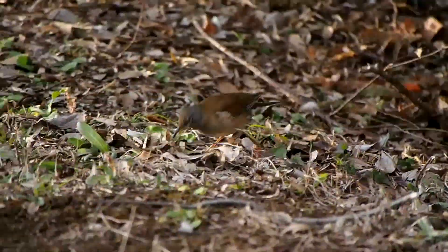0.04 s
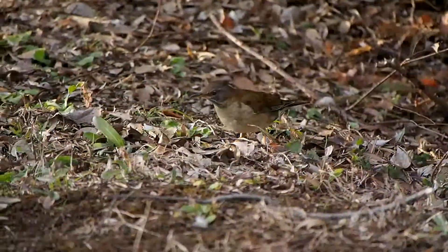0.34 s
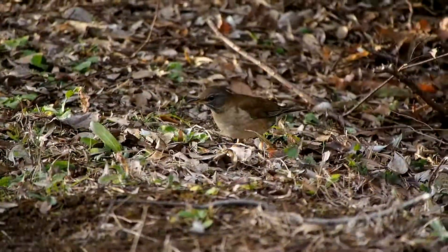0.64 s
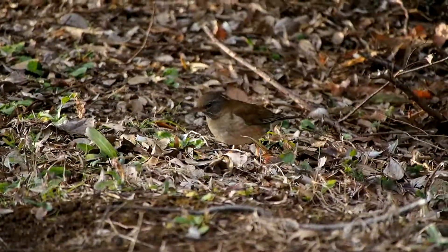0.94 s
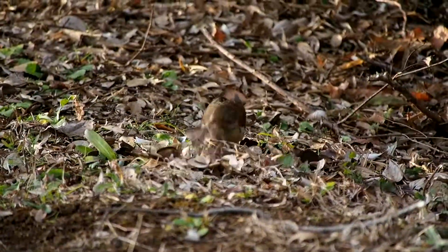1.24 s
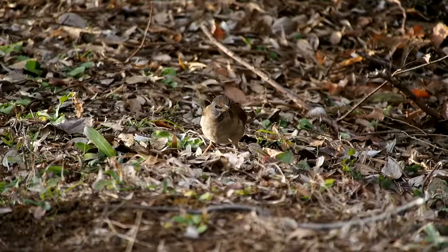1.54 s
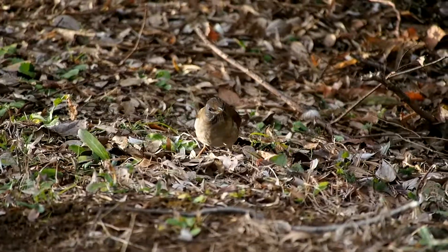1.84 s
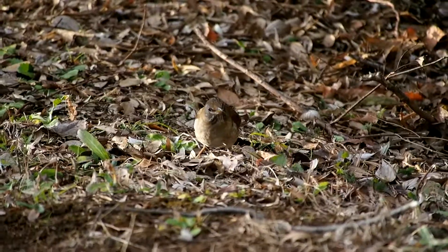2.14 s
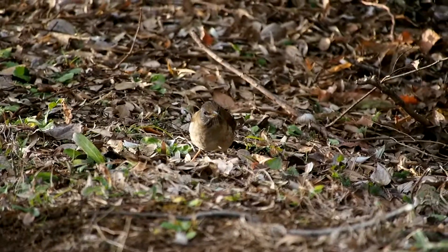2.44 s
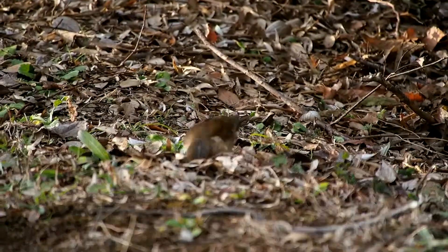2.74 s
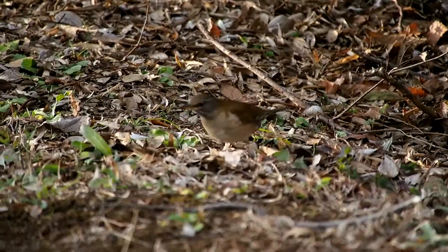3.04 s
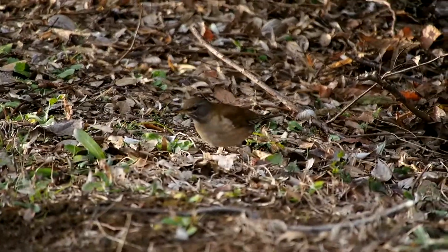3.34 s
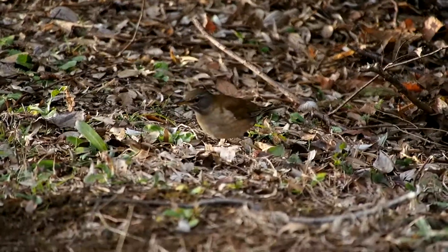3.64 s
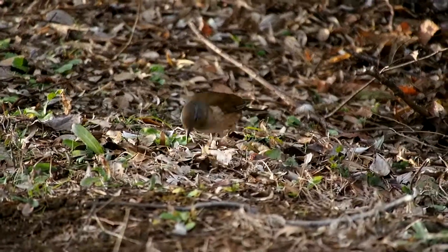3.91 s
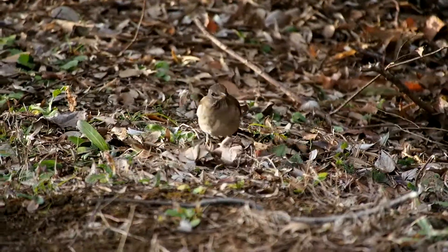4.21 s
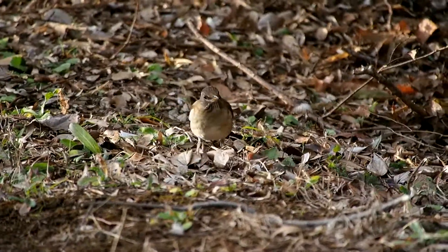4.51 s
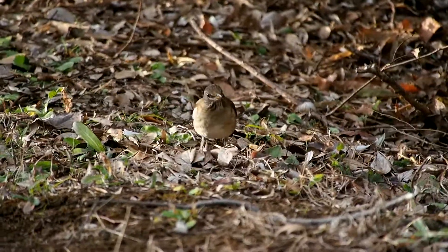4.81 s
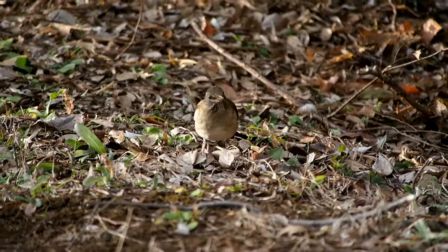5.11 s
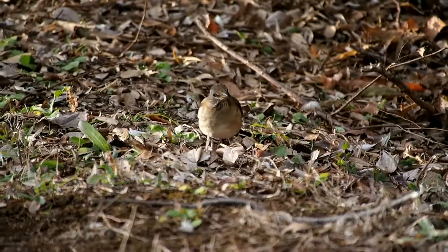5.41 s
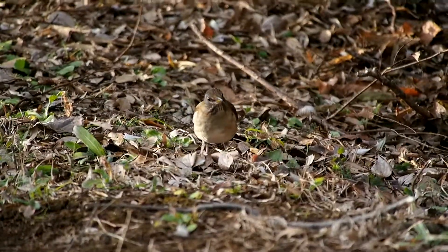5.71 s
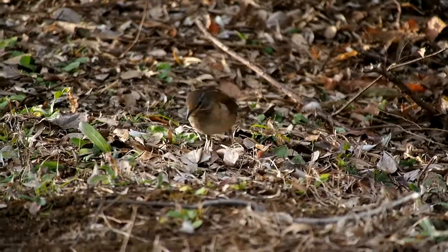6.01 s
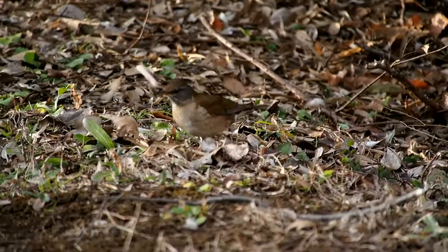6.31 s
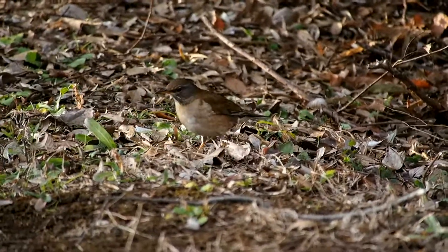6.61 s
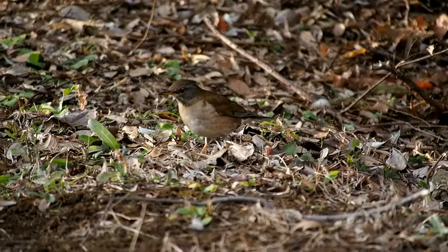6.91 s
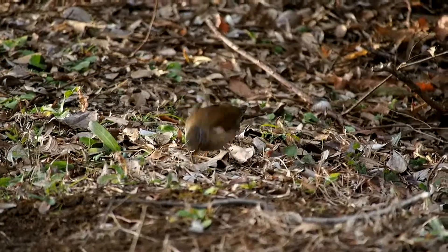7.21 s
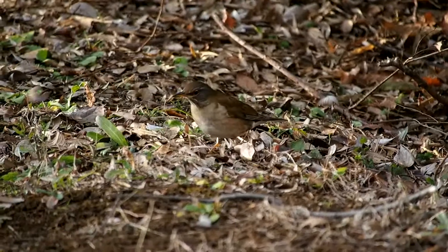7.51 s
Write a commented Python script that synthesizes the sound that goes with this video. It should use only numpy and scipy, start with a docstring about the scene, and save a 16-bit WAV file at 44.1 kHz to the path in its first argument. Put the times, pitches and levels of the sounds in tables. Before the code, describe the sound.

Crisp clicks from a plastic camera dial right by the microphone stand out against quiet woods, with far traffic and a faint hiss behind. Dry leaves crackle softly now and then as a thrush forages, and very short, high chirps come from the right, some in pairs. A distant car passes, the dial clicks one last time, and after a small knock a truck's tyres rise gently in pitch.

```python
"""Woodland floor, with a distant road throughout: tyre roar, rumble, one slowly sagging engine, faint hiss.
From the start a thrush tosses dry leaves in short bursts. At 0.14 s a plastic camera dial starts
clicking close by, among softer ticks and knocks. From 1.35 s a small bird on the right gives thin,
rising 'tsik' calls. A car swells the roar at 2 s, the dial clicks a last time at 4.1 s,
and near 6 s a truck draws close, its tyres singing upward."""
import sys
import numpy as np
from scipy import signal
from scipy.fft import rfft, irfft
from scipy.io import wavfile
from scipy.ndimage import uniform_filter1d

SR = 44100
rng = np.random.default_rng(int(sys.argv[2]) if len(sys.argv) > 2 else 0)


def wrap_up_sound(samples):
    """Save the sound to the file named by the first command line argument, as 16-bit audio."""
    columns = np.atleast_2d(samples).T
    # keep every value between -1 and 1, then stretch to whole-number steps
    tamed = np.clip(columns, -1, 1)
    steps = np.round(tamed * 32767).astype(np.int16)
    wavfile.write(sys.argv[1], SR, steps)


N = 332955
TIME_S = np.arange(N) / SR
FRAME_S = np.arange(N // 256 + 5)[:, None] * 256 / SR
BIN_HZ = np.fft.rfftfreq(1024, 1 / SR)
CAR_NEAREST_S, BAND_EDGE_HZ = 2.065, 16400

# left-right likeness of diffuse sound: freq_hz, coherence
COHERENCE = [(60, 0.76), (130, 1), (290, 0.89), (640, 0.93), (1410, 0.3), (3100, 0.022), (6820, 0.046),
             (15000, 0.05)]
# tyre roar spectra: freq_hz, density_db
FAR_ROAR = [(220, -31), (380, -22), (514, -8), (577, -8.5), (627, -9), (711, -7), (765, -2), (922, -2),
            (1060, 1), (1650, -3.5), (2170, -10.5), (2850, -13), (3160, -11.3), (3560, -19), (3760, -17),
            (4140, -22), (4600, -28.5), (5980, -28), (10100, -120)]
CAR_ROAR = [(220, -37.5), (380, -18), (520, -8), (640, -8.5), (781, 0.5), (876, -2.5), (1080, -0.5),
            (1320, -2.5), (1550, -4), (1780, -12), (3160, -18.5), (4600, -31), (5980, -29.5), (10100, -120)]
TRUCK_ROAR = [(220, -57), (380, -23), (553, -16.5), (634, 1), (689, -8), (757, -2.5), (932, 1),
              (1390, -6.5), (1640, -3), (1840, -8.5), (2190, -14.5), (2510, -19), (2850, -18.5),
              (3160, -15.5), (3560, -24.5), (3760, -24), (4230, -30.5), (4600, -38), (5980, -38),
              (10100, -120)]
# rising tyre resonance: time_s, pitch_hz, lift_db
TYRE_PEAK = [(5.5, 655, 7.5), (6.1, 715, 11), (6.4, 730, 5), (6.7, 880, 3.5), (7.55, 915, -8)]
# rumble spectra before and after the car: freq_hz, density_db
EARLY_RUMBLE = [(20, -39), (35, -34), (52, -16), (75, 6), (110, -10.5), (170, 2), (225, 4), (290, 1.5),
                (370, -6.5), (500, -27)]
LATE_RUMBLE = [(20, -42), (35, -46), (52, -20), (75, 1.5), (110, -16.5), (170, 4), (220, -1.5), (290, -4.5),
               (370, -11.5), (500, -37)]
# exhaust tones: firing_multiple, gain_db
EXHAUST_ORDERS = [(1, -9), (1.51, -12.5), (2.001, -3.5)]
# hiss spectrum: freq_hz, density_db
HISS_SPECTRUM = [(2500, -4.5), (4000, 1.5), (4800, 3), (5500, 0), (6250, 5.5), (7500, 1.5), (9000, 0.5),
                 (12000, -2), (14500, -3.5), (15600, -7), (16100, -40)]
# leaf stirs by bill and feet: middle_s, level_db, half_length_s, crunch_db
LEAF_STIRS = [(0.056, -54.5, 0.089, -12), (1.157, -57.5, 0.018, -12), (1.306, -50.5, 0.045, -10),
              (2.02, -56, 0.079, -7), (2.837, -54.5, 0.072, -12), (4.089, -54.5, 0.057, -12),
              (6.188, -55, 0.02, -8), (6.246, -48, 0.003, -16), (6.262, -45, 0.012, -20),
              (6.284, -51, 0.003, -17), (6.31, -52, .008, -9), (6.53, -55, 0.012, -6),
              (7.367, -47, 0.021, -16), (7.421, -45, 0.008, -10)]
# leaf snap spectrum: freq_hz, density_db
LEAF_SPECTRUM = [(2000, -15), (5000, -1), (6500, -1), (9000, 3.5), (12500, 3.5), (14800, 1.5), (15800, -11),
                 (16200, -22)]
# dial detents: start_s, level_db, snap_db, thud_db
DIAL_DETENTS = [(0.1441, 1.2, -3, -2), (0.3768, -18.8, -12.5, 8), (0.9444, 0, -3, -0.5),
                (1.1021, -2, -5.6, 2), (1.2124, -3, -4, 1.2), (4.1313, 1, -1, 0)]
# spring and camera body modes: freq_hz, left_db, right_db, t60_s
DIAL_MODES = [(1610, -29, -25.5, 0.0086), (2100, -25, -27.5, 0.0069), (2680, -27, -24.5, 0.0041),
              (3100, -26, -27, 0.013), (4060, -43, -20.5, 0.0029), (4750, -22, -51, 0.0054),
              (6430, -17.2, -32.5, 0.012), (6900, -17.5, -8.5, 0.0027), (8100, -4, -8, 0.0034),
              (9000, -21, -55, 0.014), (9754, 2.5, -16, 0.0011), (12160, -9.8, -6, 0.0027),
              (13630, -35, -3, 0.00045), (15410, -18, -39, 0.0051)]
# ticks and knocks, one ring a row: start_s, level_db, pitch_hz, t60_s, crack_db, left_over_right_db
TICK_RINGS = [(.1662, -37.5, 12500, .004, -12, 3), (.2100, -40, 12700, .004, -9, 8),
              (0.8078, -33.5, 12900, 0.0045, -10, 12), (0.8078, -38, 7500, 0.004, -12, 10),
              (1.0068, -20.5, 740, 0.014, -25, 2), (1.007, -23, 1400, .006, -22, 0),
              (1.0063, -27, 3170, 0.006, -17, -5), (1.0068, -30, 3850, 0.004, -19, -2),
              (1.0068, -25, 9500, 0.0014, -21, 0), (1.484, -29, 2750, 0.005, -10, -3),
              (1.4845, -30.5, 3970, 0.0054, -12, -9), (2.036, -43.5, 8150, 0.0042, 3.5, -6),
              (2.281, -44.5, 5070, 0.0046, -2, 3), (2.9106, -33, 3400, 0.005, -8, 0),
              (2.9106, -24.5, 4630, 0.0085, -19, 3), (2.9106, -35, 5700, 0.0043, -12, 5),
              (5.624, -21, 1220, 0.007, -21, 9), (5.6229, -17, 1830, 0.0085, -12, 4),
              (5.623, -23, 2500, 0.01, -17, 3), (5.6234, -27, 2880, 0.011, -19, -4),
              (5.6234, -21.5, 3870, 0.0067, -16, -3), (5.6234, -32, 4550, 0.004, -16, -2),
              (5.6234, -32, 6460, 0.0047, -19, 2), (6.1239, -29, 4720, 0.01, -16, 4),
              (6.124, -25.5, 6840, 0.0053, -21, -5), (6.124, -35, 9000, 0.0026, -17, -3),
              (6.2443, -35, 12100, .004, -19, 0), (6.2787, -34, 11500, 0.0036, -13, -4),
              (6.3095, -43, 12000, .004, -9, 0), (6.5275, -41, 9950, 0.0042, -9, 0),
              (6.5275, -41, 6000, 0.004, -14, 0), (7.3755, -36, 13000, .004, -9, 0),
              (7.4238, -35, 9500, .004, -12, 0), (7.44, -35, 10900, 0.0036, -13, -1),
              (7.44, -35, 6000, 0.004, -14, 0), (7.5438, -19, 975, .012, -12.5, 0),
              (7.5438, -26.5, 420, .015, -22, 0)]
# small bird's calls: middle_s, level_db, pitch_hz, half_length_s, sweep_ratio, glide_s, rasp_ratio
BIRD_CALLS = [(1.3508, -24, 6830, 0.0027, 0.26, 0.0025, 0), (1.431, -27, 6520, 0.0027, 0.23, 0.004, 0.55),
              (3.5292, -28, 6500, 0.0018, 0.31, 0.0028, 0.3), (3.611, -24, 6500, 0.0021, 0.24, 0.0045, 0.4),
              (5.236, -44.5, 6250, 0.0026, 0.096, 0.0026, 0.4),
              (5.873, -37, 6000, 0.0013, 0.12, 0.0015, 0.4)]


def amp(db):
    """Decibels to gain."""
    return 10 ** (np.asarray(db) / 20)


def unit_rms(x):
    """Scale to rms 1."""
    return x / np.sqrt(np.mean(x ** 2) + 1e-20)


def decay(t, t60_s):
    """Exponential fall, 60 dB in t60_s."""
    return np.exp(-np.log(1000) * t / t60_s)


def bell(x, middle, half_width):
    """Gaussian bump, 1/e at half_width."""
    return np.exp(-((x - middle) / half_width) ** 2)


def step(t, middle_s, over_s):
    """Smooth change from 0 to 1."""
    return .5 + .5 * np.tanh((t - middle_s) / over_s)


def curve(points, hz):
    """Interpolate a table over log frequency."""
    freq_hz, value = np.transpose(points)
    return np.interp(np.log(hz + 1), np.log(freq_hz + 1), value)


def pan(left_over_right_db):
    """Left and right gains."""
    return amp(np.array([[.5], [-.5]]) * left_over_right_db)


def add(mix, start_s, sound):
    """Mix a sound in at start_s."""
    part = mix[:, max(round(start_s * SR), 0):][:, :sound.shape[1]]
    part += sound[:, :part.shape[1]]


def drift(rate_hz):
    """Slow noise, rms 1."""
    hz = np.fft.rfftfreq(N, 1 / SR)
    return unit_rms(irfft(rfft(rng.standard_normal(N)) * bell(hz, 0, rate_hz), N))


def diffuse(spectrum_db, patchy_db):
    """Noise from all around: ears alike in the bass, unrelated in the treble."""
    a, b, c, d, patches = rng.standard_normal((len(FRAME_S), len(BIN_HZ), 5)).transpose(2, 0, 1)
    patches = uniform_filter1d(patches, size=12, axis=0)
    patches = unit_rms(uniform_filter1d(patches, size=6, axis=1))
    colour = amp(spectrum_db + patchy_db * patches)
    colour /= np.sqrt(uniform_filter1d((colour ** 2).sum(1), size=60))[:, None]
    coherence = curve(COHERENCE, BIN_HZ)
    left = a + 1j * b
    right = coherence * left + np.sqrt(1 - coherence ** 2) * (c + 1j * d)
    frames = colour * np.array([left, right])
    noise = signal.istft(frames.swapaxes(1, 2), nperseg=1024, noverlap=768)[1][:, :N]
    return noise / noise.mean(0).std()


def tyre_spectrum_db():
    """Far road blending into car, then truck, plus a narrow peak where the tyres sing."""
    car = bell(FRAME_S, CAR_NEAREST_S, 0.4)
    truck = step(FRAME_S, 5.57, 1.0)
    roar_db = (1 - car - truck) * curve(FAR_ROAR, BIN_HZ)
    roar_db += car * curve(CAR_ROAR, BIN_HZ) + truck * curve(TRUCK_ROAR, BIN_HZ)
    time_s, pitch_hz, lift_db = np.transpose(TYRE_PEAK)
    peak = bell(BIN_HZ / np.interp(FRAME_S, time_s, pitch_hz), 1, 0.06)
    return roar_db + np.interp(FRAME_S, time_s, lift_db) * peak


def tyre_roar(far_db=-42.5, car_gain_db=6.5, truck_gain_db=3.6, truck_s=5.85, recede_db_per_s=2):
    """A lull, a car crossing a gap in the trees, then a truck drawing near; powers add."""
    lull_db = -2.5 * bell(TIME_S, 0.46, 0.26)
    in_gap = 1 - step(TIME_S, 2.48, 0.09)
    car_power = amp(car_gain_db) ** 2 * in_gap / (1 + ((TIME_S - CAR_NEAREST_S) / 0.23) ** 2)
    near = step(TIME_S, truck_s, 0.34)
    truck_power = near * amp(truck_gain_db - recede_db_per_s * np.maximum(TIME_S - truck_s, 0)) ** 2
    level_db = far_db + lull_db + 10 * np.log10(1 + car_power + truck_power)
    return amp(level_db) * pan(-1.5 + 2.5 * near) * diffuse(tyre_spectrum_db(), patchy_db=0.81)


def rumble(far_db=-55, car_gain_db=3, car_half_power_s=1):
    """Road bass bends round the trees, outlasting the car's roar; it deepens, then ebbs with traffic."""
    car_power = amp(car_gain_db) ** 2 / (1 + ((TIME_S - CAR_NEAREST_S) / car_half_power_s) ** 2)
    ebb_db = -step(TIME_S, 3.9, 0.64)
    level_db = far_db + ebb_db + 10 * np.log10(1 + car_power)
    late = step(FRAME_S, 2.15, 0.46)
    spectrum_db = (1 - late) * curve(EARLY_RUMBLE, BIN_HZ) + late * curve(LATE_RUMBLE, BIN_HZ)
    return amp(level_db) * diffuse(spectrum_db, patchy_db=0.6)


def hum(hz, wobble, flutter):
    """Engine tone, rms 1, wavering over a long air path."""
    turns = np.cumsum(hz * (1 + wobble * drift(rate_hz=10.3))) / SR
    return unit_rms(np.sin(2 * np.pi * turns) * (1 + flutter * drift(rate_hz=15)))


def engine(start_hz=62.3, sag_hz_per_s=0.8, base_db=-54.5, load_db=7.5, ease_s=0.81):
    """Far exhaust: starts under load, eases off, slows, passes behind trees."""
    firing_hz = start_hz - sag_hz_per_s * TIME_S
    trees_db = -6 * step(TIME_S, 5.33, 0.28)
    level_db = base_db + load_db * np.exp(-TIME_S / ease_s) + trees_db
    return sum(amp(level_db + gain_db) * hum(multiple * firing_hz, wobble=0.0109, flutter=0.33)
               for multiple, gain_db in EXHAUST_ORDERS)


def drone(start_hz=232.8, sag_hz_per_s=6.5, start_db=-56.5, hold_s=1.65, fade_db_per_s=33):
    """Second, rougher engine: slows and fades as the car goes by."""
    level_db = start_db - fade_db_per_s * np.maximum(TIME_S - hold_s, 0)
    return amp(level_db) * hum(start_hz - sag_hz_per_s * TIME_S, wobble=0.0277, flutter=0.36)


def hiss(level_db=-58.74):
    """Steady air and microphone noise."""
    return amp(level_db) * diffuse(curve(HISS_SPECTRUM, BIN_HZ), patchy_db=2)


def leaves(snaps_per_s=950, spread_db=2.5, idle_db=-66, drag_db=-10, ring_hz=6400, trim_db=-3):
    """Stirred dry leaves give tiny uneven snaps and drag their neighbours; crushed ones also ring."""
    crackle_power, crunch_power = amp(idle_db) ** 2, 0
    for middle_s, level_db, half_s, crunch_db in LEAF_STIRS:
        drag = amp(drag_db) ** 2 * bell(TIME_S, middle_s, 6.7 * half_s)
        stir_power = amp(level_db) ** 2 * (bell(TIME_S, middle_s, half_s) + drag)
        crackle_power += stir_power
        crunch_power += amp(crunch_db) ** 2 * stir_power
    sizes = amp(spread_db * np.minimum(rng.exponential(1, (3, N)), 5)) * rng.choice([-1, 1], (3, N))
    snaps = sizes * (rng.random((3, N)) < snaps_per_s / SR)
    spectrum = rfft(snaps[:2] + 0.67 * snaps[2])  # third row reaches both ears
    hz = np.fft.rfftfreq(N, 1 / SR)
    crackle = unit_rms(irfft(spectrum * amp(curve(LEAF_SPECTRUM, hz)), N))
    crunch = unit_rms(irfft(spectrum * bell(hz, ring_hz, 350), N))
    return amp(trim_db) * (np.sqrt(crackle_power) * crackle + np.sqrt(crunch_power) * crunch)


def dial(spring_above_hz=9700, thud_below_hz=2900, land_s=246e-6, rise_s=40e-6, right_lead_s=72e-6):
    """A spring snaps off a tooth, then lands and rings the body, slightly differently each time."""
    t, out = np.arange(2000) / SR, np.zeros((2, N))
    ear_s = t + np.array([[0], [right_lead_s]])
    low_cut = signal.butter(2, 1000, "high", fs=SR)  # a small body radiates little bass
    for start_s, level_db, snap_db, thud_db in DIAL_DETENTS:
        click = amp(-30) * rng.standard_normal((2, len(t))) * decay(t, 0.026)  # scrape
        for k, (hz, left_db, right_db, t60_s) in enumerate(DIAL_MODES):
            if hz > spring_above_hz:
                delay_s, gain_db = 0, snap_db
            else:
                delay_s, gain_db = land_s, thud_db * (hz < thud_below_hz)
            age_s = np.maximum(ear_s - delay_s, 0)
            detuned_hz = hz * (1 + 0.011 * rng.standard_normal())
            gain_db += 0.7 * rng.standard_normal()
            ring = np.sin(2 * np.pi * detuned_hz * age_s) * decay(age_s, t60_s) * np.tanh(age_s / rise_s)
            click -= (-1) ** k * amp([[left_db], [right_db]]) * amp(gain_db) * ring
        add(out, start_s, amp(level_db) * signal.lfilter(*low_cut, click))
    return out + amp(-19) * wood_echoes(out[0])


def wood_echoes(x, near_db=-9, near_t60_s=0.082, far_db=-15, far_t60_s=0.74):
    """Quick scatter from twigs and ground, faint long tail from trunks."""
    t = np.arange(SR // 2) / SR
    scatter = rng.standard_normal((2, 2, len(t))) * (t > .003)
    response = 0
    for taps, level_db, t60_s in zip(scatter, (near_db, far_db), (near_t60_s, far_t60_s)):
        taps = taps * decay(t, t60_s)
        response += amp(level_db) * taps / np.linalg.norm(taps[0])
    return signal.fftconvolve(x[None], response, axes=1)[:, :N]


def ticks(crack_t60_s=0.033, rise_s=0.00029):
    """Ticks and knocks: a crack around a damped ring; small things crack higher and radiate no bass."""
    t, out = np.arange(2000) / SR, np.zeros((2, N))
    for start_s, level_db, hz, t60_s, crack_db, side_db in TICK_RINGS:
        band = signal.butter(1, [0.76 * hz, min(1.2 * hz, BAND_EDGE_HZ)], "band", fs=SR)
        shared, *ears = signal.lfilter(*band, rng.standard_normal((3, len(t))))
        crack = amp(crack_db) * unit_rms(shared + 1.5 * np.array(ears)) * decay(t, crack_t60_s)
        ring = np.sin(2 * np.pi * hz * t) * decay(t, t60_s)
        low_cut = signal.butter(2, 0.52 * hz, "high", fs=SR)
        tick = signal.lfilter(*low_cut, (ring + crack) * np.tanh(t / rise_s))
        add(out, start_s, amp(level_db) * pan(side_db) * tick)
    return out


def small_bird(throat_hz=6520, top_hz=8350, jitter_ratio=0.035, bounce_s=0.001306, bounce_db=-11):
    """Raspy whistles, flicked upward in milliseconds, levelling off, shaped by the throat."""
    t, calls = np.arange(-600, 600) / SR, np.zeros((1, N))
    bin_hz = np.fft.rfftfreq(len(t), 1 / SR)
    throat = amp(1.5 * bell(bin_hz, throat_hz, 260)) / (1 + (bin_hz / top_hz) ** 20)
    for middle_s, level_db, hz, half_s, sweep, glide_s, rasp in BIRD_CALLS:
        rise = np.tanh(t / glide_s)
        shake, flutter = unit_rms(uniform_filter1d(rng.standard_normal((2, len(t))), size=16))
        pitch_hz = hz * (1 + sweep * rise - 0.0296 * rise ** 2 + jitter_ratio * rasp * shake)
        phase = 2 * np.pi * np.cumsum(pitch_hz) / SR
        width_s = half_s * (1 + 0.33 * rise)  # starts faster than it ends
        envelope = (1 + rasp * flutter) * np.exp(-.5 * (t / width_s) ** 2)
        whistle = irfft(throat * rfft(envelope * np.sin(phase)))
        overtone = amp(-21) * envelope * (1 - rise) ** 2 * np.sin(2 * phase)
        add(calls, middle_s + t[0], amp(level_db) * (whistle + overtone)[None])
    # ground bounce makes the sweep flutter
    calls += amp(bounce_db) * np.interp(TIME_S - bounce_s, TIME_S, calls[0])
    return amp([[-9], [0]]) * calls + pan(-3.1) * wood_echoes(calls[0])


def scene():
    """Road and hiss behind; leaves, calls and clicks in front."""
    background = tyre_roar() + rumble() + engine() + drone() + hiss()
    return background + leaves() + dial() + ticks() + small_bird()


def record(dry):
    """Low-pass at the band edge."""
    low_pass = signal.firwin(255, BAND_EDGE_HZ, window=("kaiser", 9), fs=SR)
    return signal.oaconvolve(dry, low_pass[None], "same")


dry = scene()
out = record(dry)
wrap_up_sound(out)
```